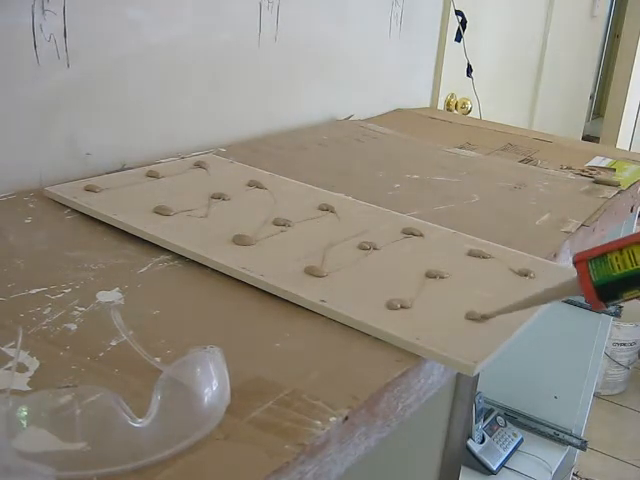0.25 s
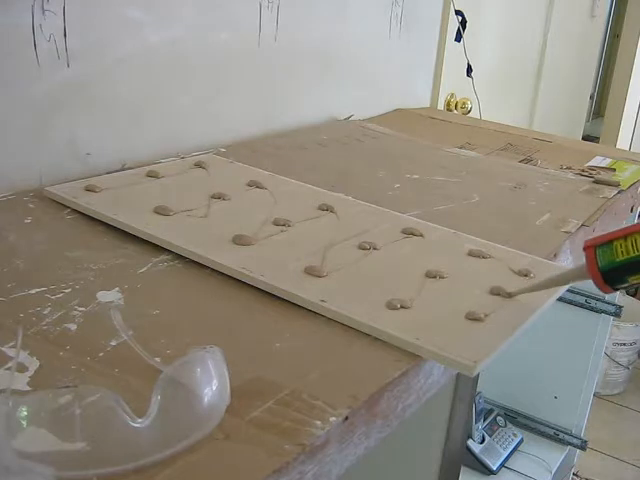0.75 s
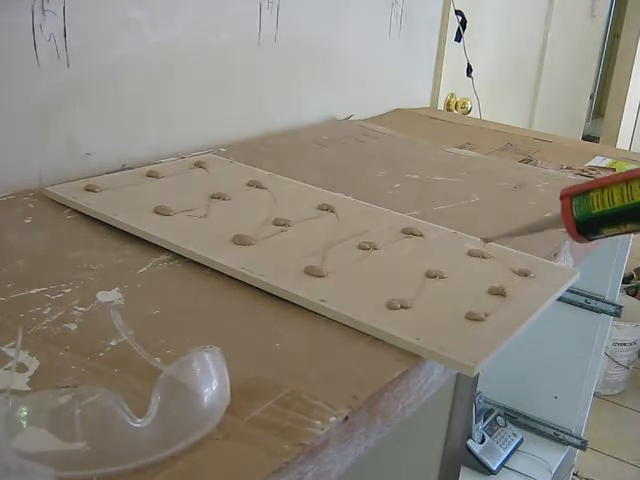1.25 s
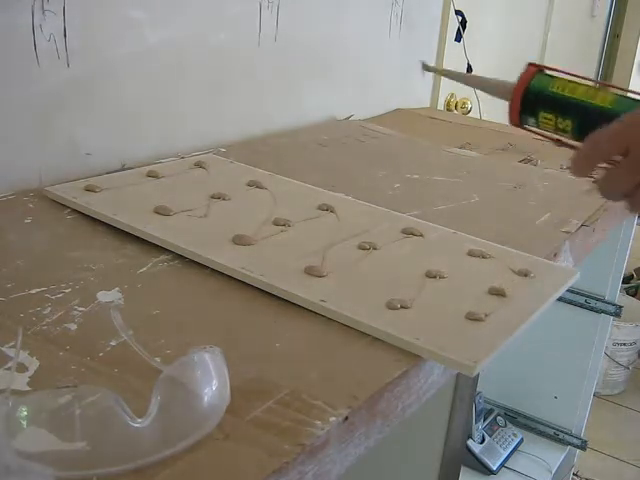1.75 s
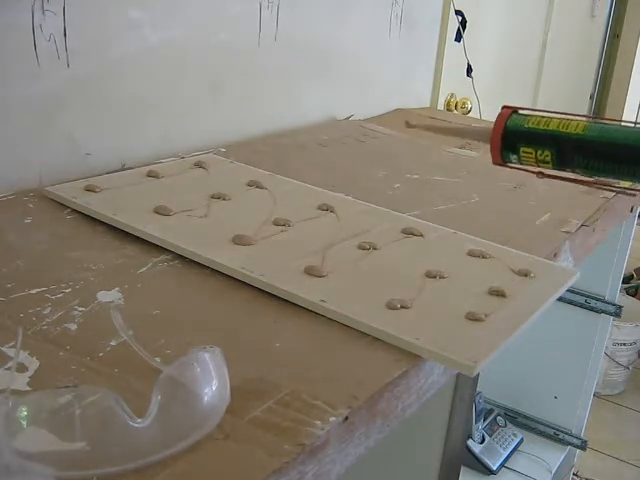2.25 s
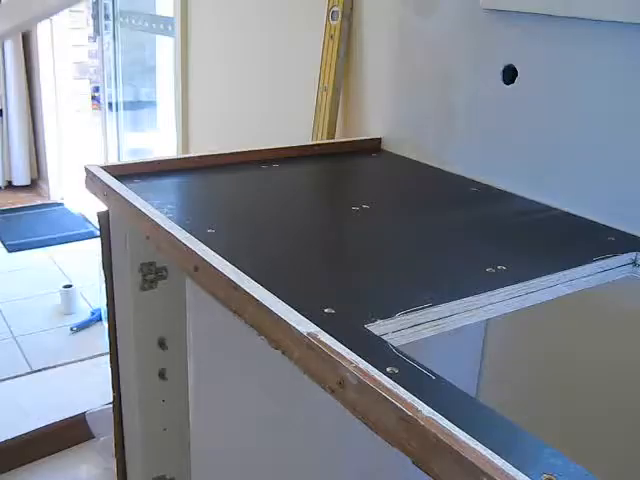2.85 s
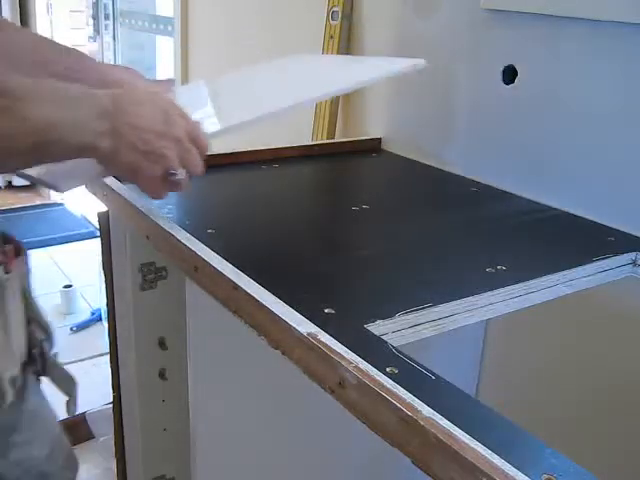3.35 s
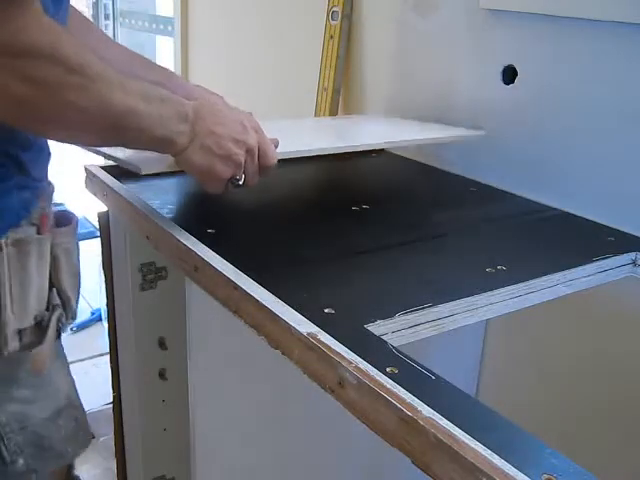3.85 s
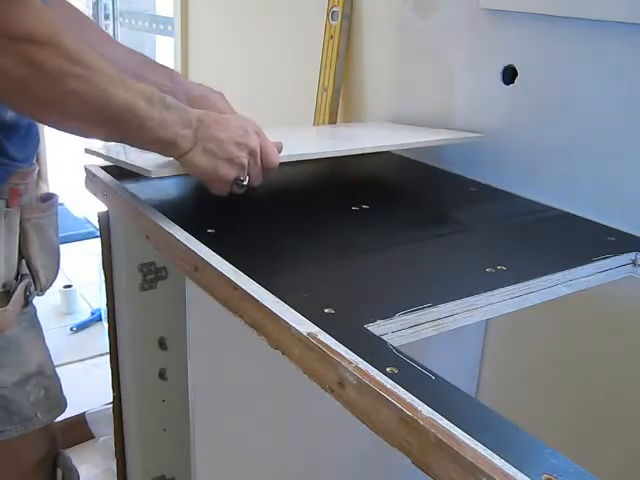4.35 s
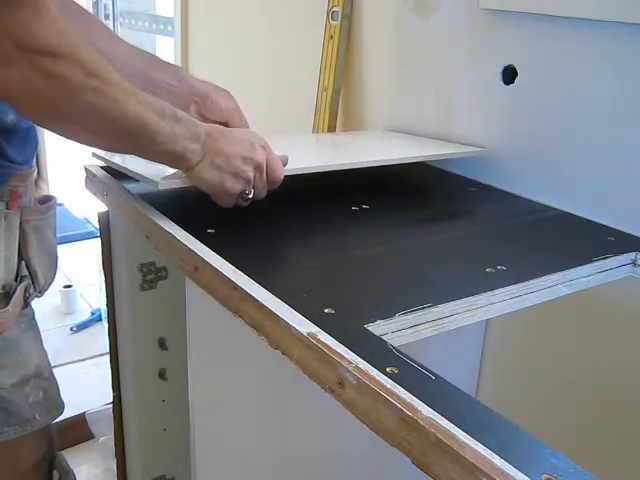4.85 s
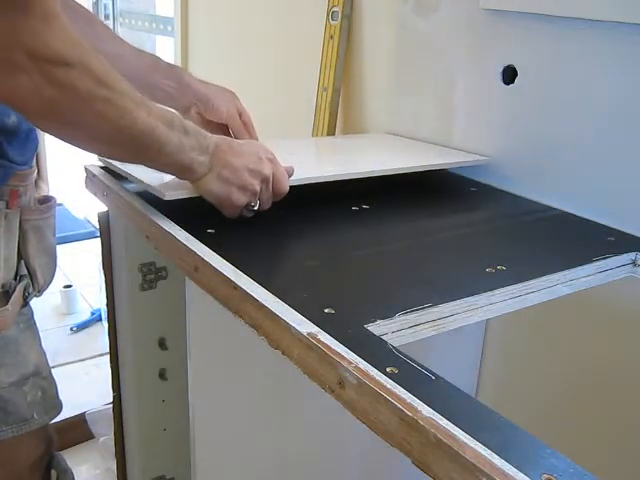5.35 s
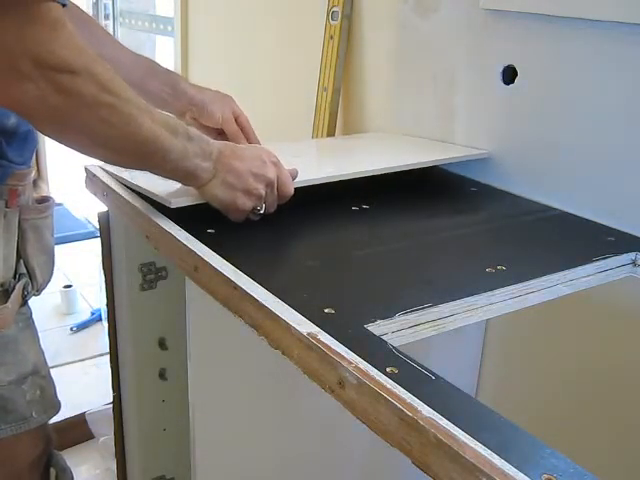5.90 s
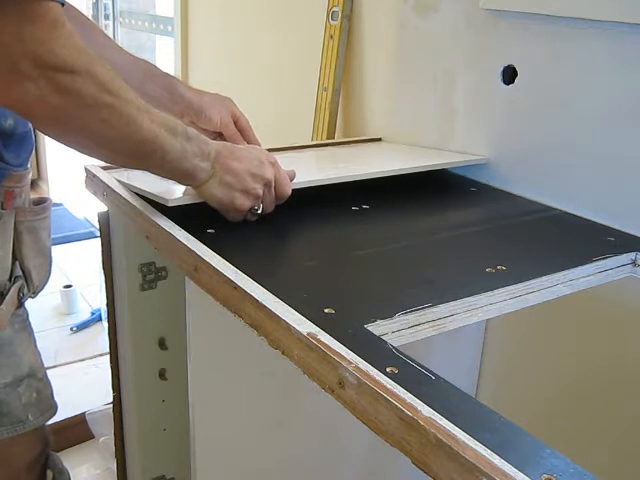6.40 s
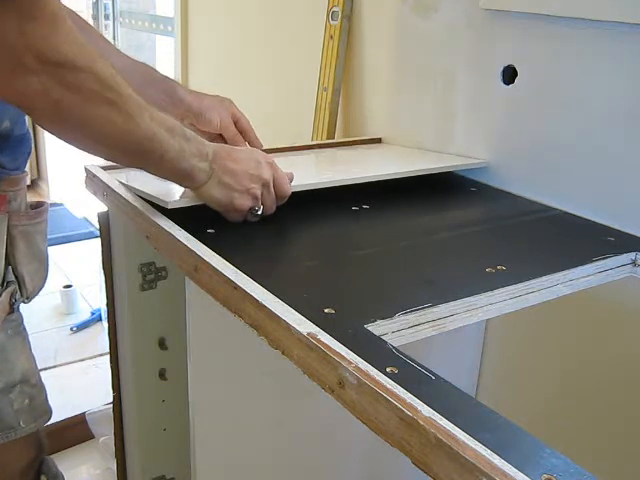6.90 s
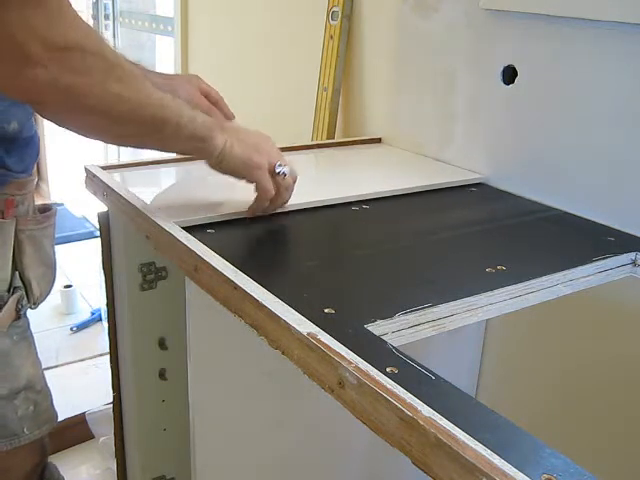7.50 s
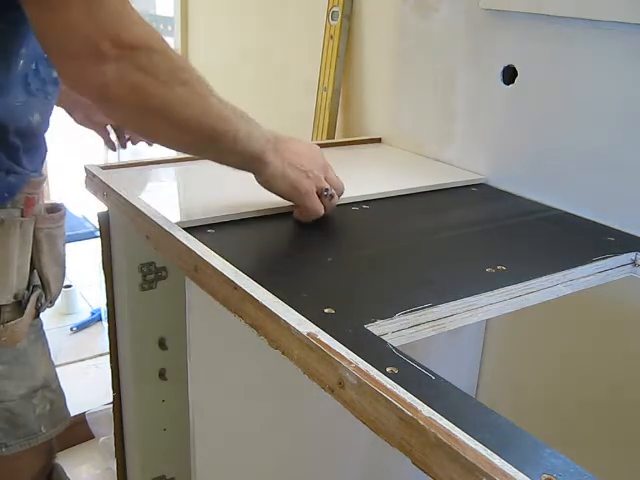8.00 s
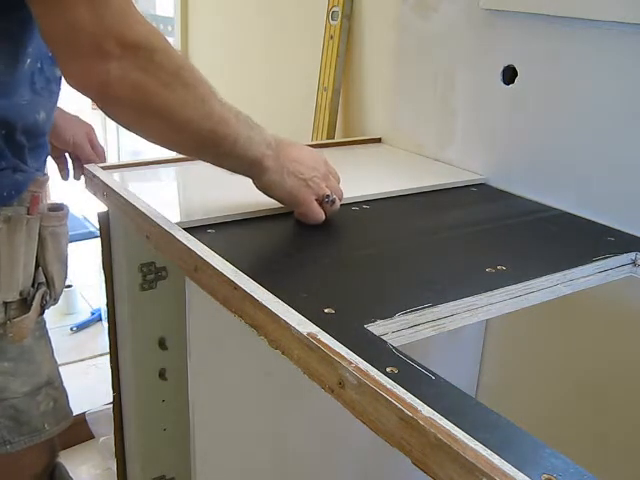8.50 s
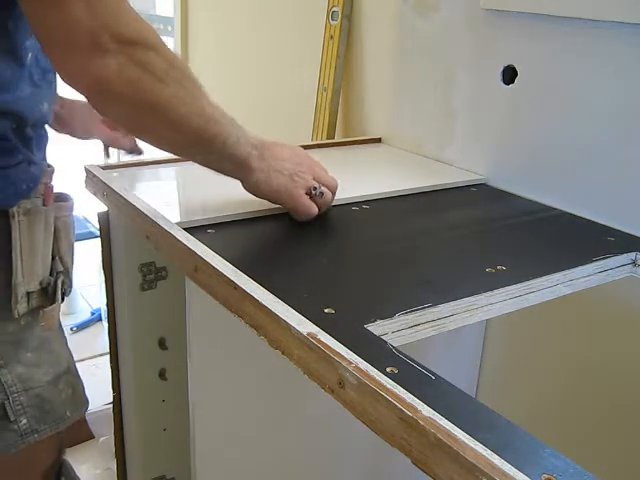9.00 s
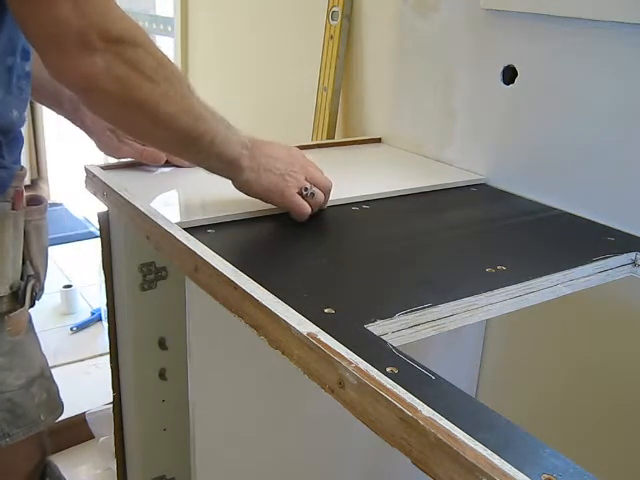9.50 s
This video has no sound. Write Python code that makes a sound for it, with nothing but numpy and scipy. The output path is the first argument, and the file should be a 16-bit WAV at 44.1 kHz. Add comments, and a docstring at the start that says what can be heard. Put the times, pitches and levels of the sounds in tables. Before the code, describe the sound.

Sharp metallic trigger snaps and a short rod squeak, a dead pause, then cloth rustle, tile scraping, hollow knocks and soft sliding in a hard room.

```python
"""Caulking gun and tile

A caulking gun clicks and twangs as struck resonators; its rod squeaks by stick-slip as the pressure is let off.
After a short silence a tile is carried to a bench, scraped along its edge, knocked into place and pressed down:
cloth rubs as shaped noise, friction excites resonances, and blows ring decaying modes of tile and bench.
Hiss and a faint hum lie beneath, in a small hard room made of decaying noise echoes.
A narrow-band mono microphone ducks its gain after sharp sounds.
"""
import sys
import numpy as np
from scipy import signal
from scipy.fft import rfft, irfft, next_fast_len
from scipy.io import wavfile
from scipy.ndimage import uniform_filter1d, minimum_filter1d

SR = 44100
rng = np.random.default_rng(int(sys.argv[2]) if len(sys.argv) > 2 else 0)


def store_pcm(level_fs):
    """Save levels as 16-bit WAV."""
    pcm = np.round(np.clip(level_fs, -1, 1) * 32767).astype(np.int16)
    wavfile.write(sys.argv[1], SR, np.atleast_2d(pcm).T)


N = 429534
TIME = np.arange(N) / SR

# background spectra at the gluing table and at the bench: (frequency [Hz], relative density [dB per Hz])
TABLE_AIR = [(15, -28.5), (25, -7), (80, -9), (150, -9), (280, -10.5), (370, -7.5), (650, -10.5),
             (1320, -16), (1870, -9), (2400, -11), (3530, -4.5), (5250, -10), (6800, -30.5), (9000, -63.5)]
BENCH_AIR = [(15, -50.5), (25, -12), (81, -5.5), (107, -8), (167, -6), (197, -7), (243, -5), (540, -8.5),
             (699, -10.5), (1550, -12), (2540, -9), (3530, -4), (5010, -7.5), (6050, -20), (6800, -29.5),
             (8840, -60.5), (15000, -120)]
# faint tones at the table and at the bench: (frequency [Hz], level [dB])
TABLE_HUM = [(200, -58.5), (385, -80.5)]
BENCH_HUM = [(82, -64.5), (166, -66.5), (3585, -58.5)]

# swishes of work clothes and tool belt on the way to the bench: (peak time [s], level [dB], release [s])
SWISHES = [(2.978, -43, 0.15), (3.055, -35.5, 0.068), (3.15, -39.5, 0.13), (3.315, -44.5, 0.15),
           (3.61, -49.5, .2)]
# spectrum of rubbing cloth: (frequency [Hz], relative density [dB per Hz])
CLOTH_SPECTRUM = [(60, -8), (250, 6.5), (800, -2.5), (1500, -1), (2500, 4.5), (4500, 1), (6500, -20)]

# soft nudges that leave tile and table humming: (time [s], frequency [Hz], level [dB], t60 [s])
NUDGES = [(0, 416, -45, 0.22), (0, 1072, -40.5, 0.15), (0, 1150, -38.5, 0.17), (0, 1314, -47, 0.28),
          (.478, 397, -37.5, 0.27), (.478, 471, -37, 0.26)]

# pushes dragging the tile's edge over the bench:
# (peak time [s], level [dB], release [s], groan of the panel relative to the level [dB])
PUSHES = [(3.705, -25.5, 0.089, -9), (3.763, -30, 0.027, 4), (3.804, -40, 0.058, 9.5),
          (3.836, -33, .09, -20.5), (3.894, -33.5, .1, -26)]
# light scuffs of the tile sliding under the fingers: (peak time [s], level [dB], release [s])
SCUFFS = [(4.205, -38, 0.072), (4.345, -41, 0.14), (4.75, -47, 0.081), (4.93, -41.5, 0.31),
          (5.31, -47.5, 0.1), (5.41, -47.5, 0.17), (5.93, -39, 0.037), (6.955, -43, 0.088),
          (7.10, -36.5, 0.091), (7.22, -53, 0.14), (7.282, -34, 0.071), (7.435, -40.5, .08)]
# the rubbed glaze squeals: (peak time [s], level [dB], release [s])
SQUEALS = [(6.065, -46.5, 0.25)]
# resonances of the dragged and of the sliding tile: (frequency [Hz], width [Hz], relative level [dB])
DRAG_PEAKS = [(341, 51, 1), (420, 142, -2), (630, 63, -3.5), (770, 87, -2.5), (1047, 65, -2),
              (1400, 280, -11), (2330, 340, -10), (2890, 550, -12.5), (4620, 1050, -17)]
SLIDE_PEAKS = [(415, 130, -6), (716, 240, -8.5), (1007, 92, 0), (1347, 59, -4.5), (1566, 50, -3.5),
               (2012, 74, -2), (2318, 46, 3.5), (2570, 60, 1), (2890, 130, -2), (3380, 89, -1.5),
               (3750, 87, -5), (4550, 150, -5)]

# modes of the tile juddering over the lip of the bench: (frequency [Hz], relative level [dB], t60 [s])
JUDDER_MODES = [(205, -10, 0.046), (290, -2, 0.035), (372, -3.5, 0.057), (432, -4, 0.04), (584, -4, 0.028),
                (820, -4, 0.013)]

# blows on tile and bench:
# (time [s], level [dB], contact brightness as top edge [Hz], low edge [Hz], relative crack strength [dB])
KNOCKS = [(.472, -32, 910, 420, -21), (1.707, -25, 564, 382, -3), (3.017, -25.5, 262, 70.5, 5.5),
          (3.031, -20.5, 280, 71, -3), (3.051, -32.5, 500, 70, 7.5), (3.149, -30, 442, 70, -14),
          (3.162, -28.5, 710, 70, -15.5), (3.189, -29, 328, 69, -11), (3.309, -38, 2610, 56, 7.5),
          (3.433, -38, 1200, 119, -18.5), (3.590, -34.5, 590, 120, -27), (3.669, -27, 450, 120, -33.5),
          (3.682, -26.5, 1500, 120, 8.5), (3.698, -23, 1200, 110, -3.5), (3.71, -22, 1296, 89, -6.5),
          (3.728, -23, 1190, 90, -1.5), (5.678, -26, 1570, 70, -4), (5.711, -26.5, 383, 40, -1.5),
          (5.757, -34, 990, 30, -17), (6.1512, -16.5, 2720, 110, 7), (6.2357, -16, 1960, 118, 6),
          (6.357, -21, 990, 150, -5), (6.426, -21, 1800, 129, 4), (6.4700, -24.5, 4000, 160, 17.5),
          (6.588, -23.5, 1590, 110, -4), (6.646, -32.5, 1200, 101, -14), (6.953, -52, 4000, 500, 15),
          (7.3025, -21, 1690, 100, 8), (7.310, -23, 1160, 80, 14), (7.333, -23, 1100, 70, -4),
          (9.413, -27.5, 170, 87.5, -31)]
# strongest modes of the tile on the bench: (frequency [Hz], relative level [dB], t60 [s])
BENCH_MODES = [(68, -21.5, 0.47), (178.2, -11, 0.41), (216.4, -5, 0.31), (251, -21, 0.26),
               (293.3, -14, 0.3), (358, -15.5, .35), (423.3, -16.5, 0.19), (454, -17, 0.35),
               (572, -7, 0.26), (619.5, -15, 0.49), (649, -20, 0.5), (930, -6.5, 0.15), (1027, -10, 0.14),
               (1067, -13.5, .22), (1084, -19, 0.2), (1435, -22.5, 0.2), (1690, -24, 0.14),
               (1714, -23.5, 0.51)]
# the crowd of weaker modes: (frequency [Hz], relative density [dB per Hz], t60 [s])
BENCH_CROWD = [(40, 4, 0.23), (103, -2, 0.29), (216, -10, 0.46), (464, 0, 0.14), (805, -10.5, .25),
               (1060, -5.5, 0.17), (1800, -3, 0.06), (2550, -8, 0.084), (3500, -26.5, 0.033),
               (7000, -30, 0.028)]
# booms of the hollow cabinet under heavy blows: (time [s], level [dB])
BOOMS = [(3.16, -44), (3.71, -57), (5.689, -41.5), (5.759, -51), (6.154, -39), (6.59, -42), (7.313, -40),
         (9.422, -50)]
# modes of the cabinet: (frequency [Hz], relative level [dB], t60 [s])
CABINET_MODES = [(37.3, -5, 1), (47, -3, .35), (67.7, 0, 0.82), (78, -6.5, 0.32)]

# resonances of the rod: (frequency [Hz], width [Hz], relative level [dB])
ROD_PEAKS = [(1780, 200, -13.5), (3070, 160, -4.5), (3580, 214, -8), (5000, 540, -13), (5800, 680, -23)]

# jolts of the plunger in its tube when the pressure changes: (time [s], level [dB])
JOLTS = [(.851, -39), (1.1215, -32.5), (1.725, -57), (2.29, -41)]

# snaps of trigger and catch plate:
# (time [s], level [dB], pitch [Hz], spring relative to the level [dB], frame ring relative to the level [dB])
TRIGGER = [(0.3645, -12.5, 2970, -15, -22), (0.85, -13.5, 3750, -33, -36), (0.854, -16, 4100, -22, -43),
           (0.854, -17.5, 3100, -33, -29.5), (1.0705, -22, 3100, -25, -10.5),
           (1.1214, -12.5, 3770, -33, -24.5), (1.1215, -7, 2420, 0, -22), (1.269, -25, 2410, -10, -3),
           (1.3496, -17.5, 3070, -8, -9.5), (1.3801, -17, 2270, -12.5, -14.5),
           (1.4952, -20, 3050, -12.5, -5.5), (1.611, -25.5, 1620, -11.5, -24.5),
           (1.7048, -15, 3550, -6.5, -27), (1.7068, -15, 2620, -21, -20.5), (1.7260, -13, 3400, -21, -0.5)]
# modes of the gun's steel frame: (frequency [Hz], relative level [dB], t60 [s])
FRAME_MODES = [(1770, -11, 0.05), (1870, -20.5, 0.36), (1810, -16, .12), (1960, -13, 0.18),
               (1990, -20.5, 0.083), (2370, -24.5, 0.2), (2630, -29.5, 0.18), (2670, -29, .16),
               (2860, -27, 0.16), (3200, -34.5, .1), (3530, -26, .1), (3640, -30, .08), (4420, -21, 0.2)]
# modes of the return spring: (frequency [Hz], relative level [dB], t60 [s])
SPRING_MODES = [(474, -23, .54), (496, -26.5, .2)]

TABLE_AIR_DB, BENCH_AIR_DB = -43.5, -45
PAUSE_START_S, PAUSE_END_S = 2.451, 2.65
SWISH_ATTACK_S, PUSH_ATTACK_S, SCUFF_ATTACK_S, SQUEAL_ATTACK_S = 0.02, 0.036, 0.071, 0.034
GROAN_HZ, SQUEAL_HZ = 409.4, 2880
JUDDER_START_S, JUDDER_GAP_S = 5.8329, 0.0112
JUDDER_DB, JUDDER_LOSS_DB = -20.5, 1.43   # first slip; loss per slip
CLATTER_T60_S, BUZZ_T60_S = 0.055, 0.25
ROD_START_S, ROD_HOLD_S, ROD_RELEASE_S = 2.2898, 0.033, 0.022
ROD_DB, ROD_SLIPS_PER_S, ROD_PITCH_HZ = -23.5, 400, 3480
JOLT_HZ, JOLT_T60_S = 85, 0.045
ROOM_T60_S, WALL_CUT_HZ = 0.5, 4200
DUCK_ABOVE_HZ, DUCK_THRESHOLD_DB, DUCK_SLOPE = 2500, -34, 0.47   # slope in dB per dB
DUCK_ATTACK_S, DUCK_HOLD_S, RECOVER_DB_PER_S = 0.03, 0.3, 16.5
RESTART_DUCK_DB = 7   # the gain starts low after the pause
OVERLOAD = 0.67   # peaks are rounded towards this amplitude
CUTOFF_HZ = 6500


def from_db(db):
    """Logarithmic level: decibels to amplitude gain."""
    return 10 ** (np.asarray(db) / 20)


def rms_one(x):
    """Mean power: scale to an rms of 1."""
    return x / np.sqrt(np.mean(x ** 2) + 1e-20)


def add(out, s, sound):
    """Superposition: mix a sound in at a time in seconds."""
    start = max(round(s * SR), 0)
    out[start:start + len(sound)] += sound[:N - start]


def cut(x, hz, kind, order=2):
    """Linear filtering: Butterworth low- or high-pass."""
    sections = signal.butter(order, np.clip(hz, 10, 0.45 * SR), kind, fs=SR, output="sos")
    return signal.sosfilt(sections, x + 1e-18)


def decay(t, t60):
    """Exponential decay: 60 dB of loss in t60 seconds."""
    return np.exp(-np.log(1000) * t / t60)


def coloured(spectrum):
    """Spectral shaping: noise weighted by (Hz, dB) points; rms 1."""
    hz, db = np.transpose(spectrum)
    size = next_fast_len(N)
    bins = np.log(np.fft.rfftfreq(size, 1 / SR) + 1)
    gain = from_db(np.interp(bins, np.log(hz), db))
    return rms_one(irfft(rfft(rng.standard_normal(size)) * gain, size)[:N])


def resonate(x, peaks):
    """Forced resonance: parallel two-pole resonators (Hz, width, dB) of alternating sign."""
    out = 0
    for k, (hz, width, db) in enumerate(peaks):
        radius = np.exp(-np.pi * width / SR)
        poles = [1, -2 * radius * np.cos(2 * np.pi * hz / SR), radius * radius]
        gain = (-1) ** k * from_db(db) * (1 - radius * radius) / 2
        out = out + gain * signal.lfilter([1, 0, -1], poles, x + 1e-18)
    return out


def ring(modes, scatter_db):
    """Modal vibration: one second of decaying sines (Hz, dB, t60) of chance strength and sign."""
    t = TIME[:SR]
    out = 0
    for hz, db, t60 in modes:
        strength = rng.choice([-1, 1]) * from_db(db + scatter_db * rng.normal())
        out = out + strength * decay(t, t60) * np.sin(2 * np.pi * hz * t)
    return out


def dying_noise(rows):
    """High modal density: one second of noise bands, each with its own decay; unit energy."""
    hz, db, t60 = np.transpose(rows)
    bins = np.log2(np.fft.rfftfreq(SR, 1 / SR) + 1)
    white, out = rfft(rng.standard_normal(SR)), 0
    for k, own in enumerate(np.eye(len(hz))):
        # triangular bands overlap to cover the spectrum
        band = irfft(white * np.interp(bins, np.log2(hz), own), SR)
        out = out + from_db(db[k]) * band * decay(TIME[:SR], t60[k])
    out = cut(out, CUTOFF_HZ, "low")
    return out / np.sqrt(np.sum(out ** 2))


def friction(per_s, spread_db):
    """Dry friction: tiny catches of uneven size at random moments."""
    catches = rng.random(N) < per_s / SR
    sizes = from_db(spread_db * np.clip(rng.standard_normal(N), -2, 2))
    return catches * rng.choice([-1, 1], N) * sizes


def strokes(rows, attack_s):
    """Envelope of hand strokes: the gain rises 20 dB per attack and falls 20 dB per release."""
    gain = 0
    for s, db, release_s in rows:
        distance = np.maximum((s - TIME) / attack_s, (TIME - s) / release_s)
        gain = gain + from_db(db - 20 * np.clip(distance, 0, 10))
    return gain


def background(spectrum, hiss_db, hum):
    """Stationary noise: hiss over faint tones, unsteady because narrow resonances filter noise."""
    tones = 0
    for hz, db in hum:
        tones = tones + from_db(db) * rms_one(resonate(rng.standard_normal(N), [(hz, 3, 0)]))
    return from_db(hiss_db) * coloured(spectrum) + tones


def clothes(crinkle_db=3, crinkle_hz=90):
    """Amplitude modulation: cloth rubs in small uneven bursts of shaped noise."""
    bursts = from_db(crinkle_db * rms_one(cut(rng.standard_normal(N), crinkle_hz, "low")))
    return strokes(SWISHES, SWISH_ATTACK_S) * rms_one(coloured(CLOTH_SPECTRUM) * bursts)


def nudges():
    """Free vibration: each nudge leaves a soft decaying tone."""
    out = np.zeros(N)
    for s, *mode in NUDGES:
        add(out, s, ring([mode], scatter_db=1))
    return out


def slide():
    """Fine friction: dense catches sound the resonances of the sliding tile."""
    grit = friction(per_s=4000, spread_db=2.5)
    return strokes(SCUFFS, SCUFF_ATTACK_S) * rms_one(resonate(grit, SLIDE_PEAKS))


def squeal():
    """Narrow resonance: rubbing noise on the glaze excites one thin pitch."""
    pitch = resonate(rng.standard_normal(N), [(SQUEAL_HZ, 45, 0)])
    return strokes(SQUEALS, SQUEAL_ATTACK_S) * rms_one(pitch)


def drag():
    """Coarse friction: sparser catches of grit sound the resonances of the dragged tile."""
    grit = friction(per_s=1100, spread_db=3)
    pushing = strokes([push[:3] for push in PUSHES], PUSH_ATTACK_S)
    return pushing * rms_one(resonate(grit, DRAG_PEAKS))


def groan():
    """Frequency modulation: the panel groans under the dragged tile as a tone of wandering pitch."""
    waver = rms_one(cut(rng.standard_normal(N), 45, "low"))
    rows = [(s, db + groan_db, release_s) for s, db, release_s, groan_db in PUSHES]
    phase = 2 * np.pi * np.cumsum(GROAN_HZ * (1 + 0.09 * waver)) / SR
    return strokes(rows, PUSH_ATTACK_S) * np.sqrt(2) * np.sin(phase)


def judder(count=8):
    """Stick-slip: the edge jumps the lip in regular, dull, damped slips, each weaker on the whole."""
    out = np.zeros(N)
    for k in range(count):
        slip = cut(ring(JUDDER_MODES, scatter_db=1.5), 1300, "low")
        add(out, JUDDER_START_S + k * JUDDER_GAP_S, from_db(JUDDER_DB - k * JUDDER_LOSS_DB) * slip)
    return out


def knocks(crowd_db=25, modes_db=-4, crack_db=22, crack_hz=1150, crack_width_hz=1100, clatter_db=-28):
    """Impact: a crack with brief clatter, then ringing modes, within the band that each contact excites."""
    out = np.zeros(N)
    for s, db, bright_hz, low_hz, sharp_db in KNOCKS:
        clatter = from_db(clatter_db) * rng.standard_normal(SR) * decay(TIME[:SR], CLATTER_T60_S)
        contact = signal.unit_impulse(SR) + clatter
        crack = resonate(contact, [(crack_hz, crack_width_hz, crack_db + sharp_db)])
        crowd = from_db(crowd_db) * dying_noise(BENCH_CROWD)
        body = crowd + from_db(modes_db) * ring(BENCH_MODES, scatter_db=1.0)
        blow = cut(body + crack, bright_hz, "low")
        add(out, s, from_db(db) * cut(blow, low_hz, "high"))
    return out


def booms():
    """Cavity resonance: the hollow cabinet answers with its low modes."""
    out = np.zeros(N)
    for s, db in BOOMS:
        add(out, s, from_db(db) * cut(ring(CABINET_MODES, scatter_db=1.0), 110, "low"))
    return out


def rod(jitter=0.21, rasp_db=-30, pitch_width_hz=330, pitch_db=6, knock_db=-24):
    """Stick-slip: the rod slips through the catch plate hundreds of times a second, with a rasp between."""
    stop = ROD_START_S + ROD_HOLD_S
    slips, s = np.zeros(N), ROD_START_S
    for gap in np.exp(jitter * rng.standard_normal(size=30)) / ROD_SLIPS_PER_S:
        add(slips, s, np.ones(1))
        s += gap
    force = slips + from_db(rasp_db) * rng.standard_normal(N)
    steel = resonate(force, ROD_PEAKS)
    # one resonance of the rod stands far out of the rest
    pitch = resonate(steel, [(ROD_PITCH_HZ, pitch_width_hz, pitch_db)])
    knock = from_db(knock_db) * cut(force, 1500, "low", order=1)
    squeak = steel + pitch + knock
    started = TIME > ROD_START_S
    release_db = -60 * np.clip((TIME - stop) / ROD_RELEASE_S, 0, 2)
    envelope = started * from_db(ROD_DB + release_db)
    return envelope * squeak / np.std(squeak[started & (TIME < stop)])


def jolts():
    """Damped oscillation: the plunger gives a short, dull thump."""
    out = np.zeros(N)
    for s, db in JOLTS:
        add(out, s, ring([(JOLT_HZ, db, JOLT_T60_S)], scatter_db=1.5))
    return out


def trigger(snap_width_hz=430, snap_db=28.0, tick_db=10.5, tick_low_hz=1200, tick_high_hz=3400,
            thud_db=-3, thud_hz=650, buzz_db=-7):
    """Impulse response: a snap gives tick, buzzing ping and thud, and spring and frame ring on."""
    out, click = np.zeros(N), signal.unit_impulse(SR)
    tick = from_db(tick_db) * cut(cut(click, tick_low_hz, "high"), tick_high_hz, "low", order=4)
    thud = from_db(thud_db) * cut(click, thud_hz, "low")
    dying = decay(TIME[:SR], BUZZ_T60_S)
    for s, db, hz, spring_db, frame_db in TRIGGER:
        buzz = from_db(buzz_db) * rng.standard_normal(SR) * dying / np.sqrt(np.sum(dying ** 2))
        ping = cut(resonate(click + buzz, [(hz, snap_width_hz, snap_db)]), hz, "low")
        spring = from_db(spring_db) * ring(SPRING_MODES, scatter_db=0.5)
        frame = from_db(frame_db) * ring(FRAME_MODES, scatter_db=2)
        add(out, s, from_db(db) * (tick + ping + thud + spring + frame))
    return out


def reflections():
    """Diffuse reverberation: dense decaying echoes that favour no single pitch; unit energy."""
    t = TIME[:SR]
    dying = decay(t, ROOM_T60_S) * np.minimum(t / 0.0035, 1)   # reflections take a moment to build
    echoes = rng.standard_normal(SR) * dying
    for _ in range(4):   # even out the spectrum, then restore the decay
        echoes = irfft(np.exp(1j * np.angle(rfft(echoes))), SR)
        local_power = np.abs(uniform_filter1d(echoes ** 2, size=441))
        echoes = echoes * dying / np.sqrt(local_power + 1e-20)
    echoes = cut(echoes, WALL_CUT_HZ, "low", order=1)
    return echoes / np.sqrt(np.sum(echoes ** 2))


def gain_control(x):
    """Automatic gain control: loud treble ducks the gain, which holds and creeps back, moving the hiss."""
    treble_power = uniform_filter1d(cut(x, DUCK_ABOVE_HZ, "high") ** 2, size=441)
    treble_db = 10 * np.log10(np.abs(treble_power) + 1e-12)
    duck_db = DUCK_SLOPE * np.maximum(treble_db - DUCK_THRESHOLD_DB, 0)
    half_hold = int(DUCK_HOLD_S * SR / 2)
    # running maximum over the hold time
    duck_db = -minimum_filter1d(-duck_db, 2 * half_hold + 1, origin=half_hold)
    duck_db[(TIME > PAUSE_START_S) & (TIME < PAUSE_END_S)] = RESTART_DUCK_DB
    # the ducking falls no faster than the recovery rate
    recovery_db = RECOVER_DB_PER_S * TIME
    duck_db = np.maximum.accumulate(duck_db + recovery_db) - recovery_db
    lag = np.exp(-1 / (DUCK_ATTACK_S * SR))
    return from_db(-signal.lfilter([1 - lag], [1, -lag], duck_db))


def scene(gun_room_db=-9, rod_room_db=-21, bench_room_db=-9):
    """Superposition of direct sound, reverberation and air, with a separate room send for each source."""
    table_air = background(TABLE_AIR, TABLE_AIR_DB, TABLE_HUM)
    bench_air = background(BENCH_AIR, BENCH_AIR_DB, BENCH_HUM)
    air = np.where(TIME < PAUSE_START_S, table_air, bench_air)
    scrapes = drag() + groan() + slide() + squeal()
    bench = clothes() + scrapes + judder() + knocks() + booms()
    squeak = rod()
    gun = nudges() + jolts() + trigger()
    sent = from_db(gun_room_db) * gun + from_db(rod_room_db) * squeak + from_db(bench_room_db) * bench
    room = signal.fftconvolve(sent, reflections())[:N]
    return (gun + squeak + bench + room + air)[None]


def record(dry):
    """Saturation and band limiting: gain control, rounded peaks, offset, silent pause, steep top cut."""
    offset = 0.0025   # small steady shift of the waveform
    running = (TIME < PAUSE_START_S) | (TIME > PAUSE_END_S)
    rounded = OVERLOAD * np.tanh(dry * gain_control(dry[0]) / OVERLOAD)
    return cut((rounded + offset) * running, CUTOFF_HZ, "low", order=24)


dry = scene()
out = record(dry)
store_pcm(out)
```